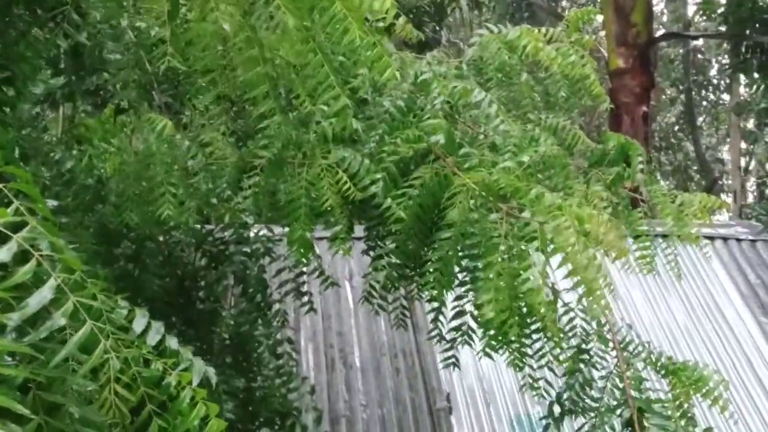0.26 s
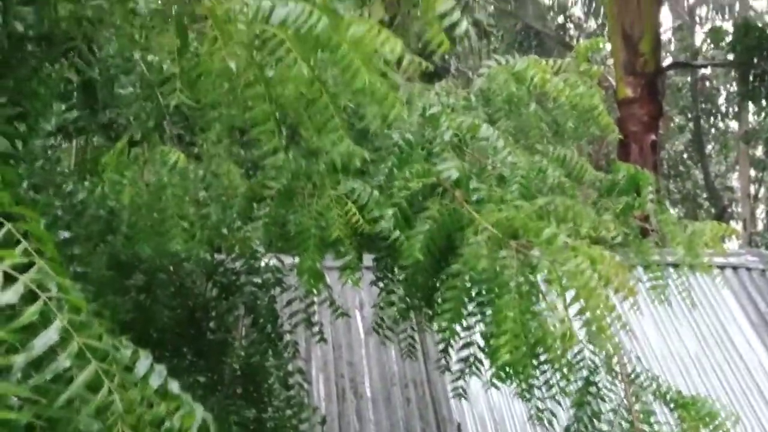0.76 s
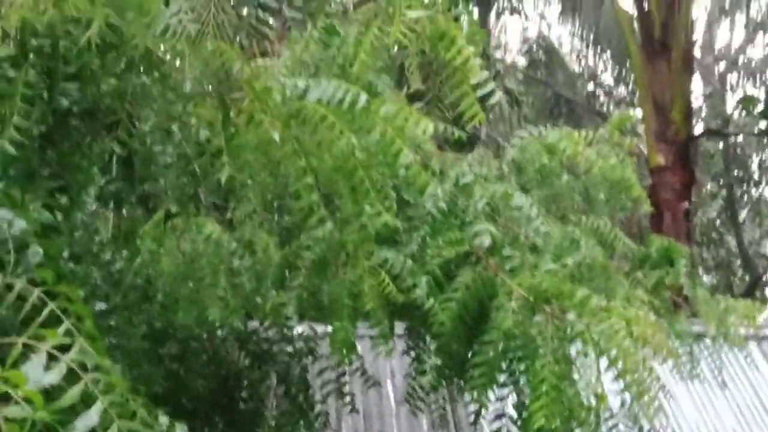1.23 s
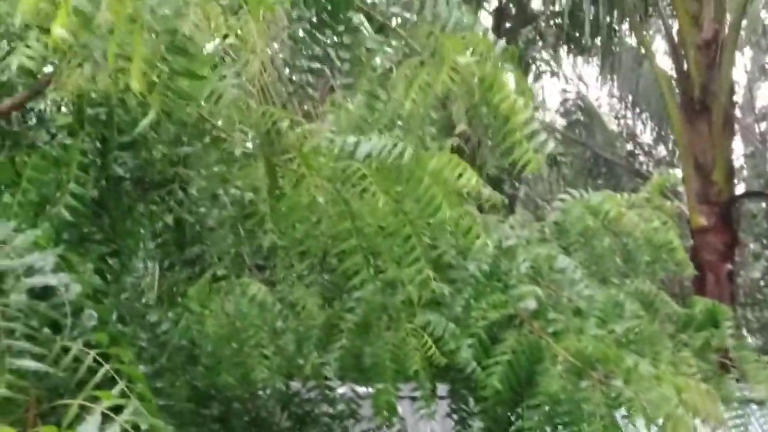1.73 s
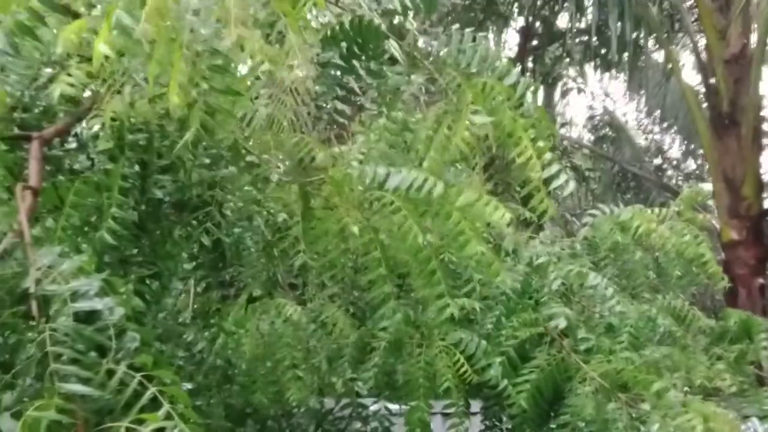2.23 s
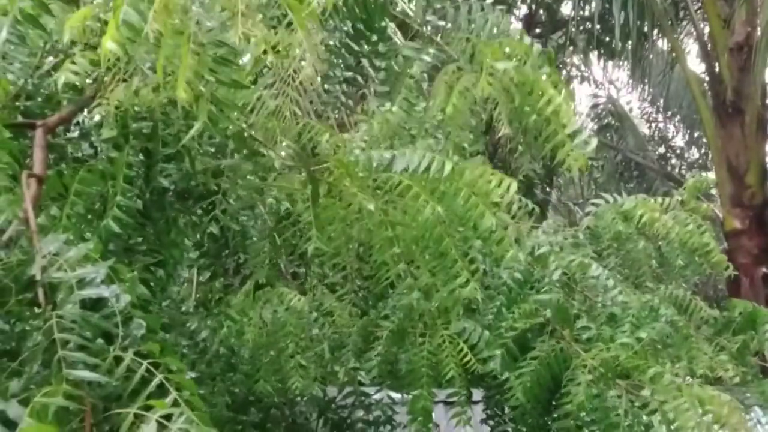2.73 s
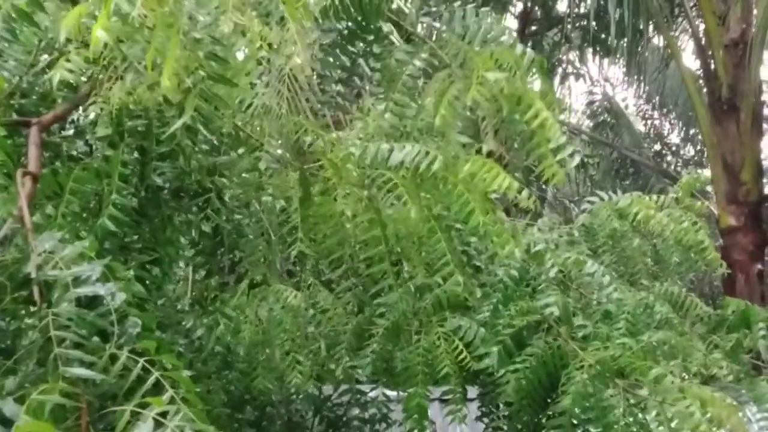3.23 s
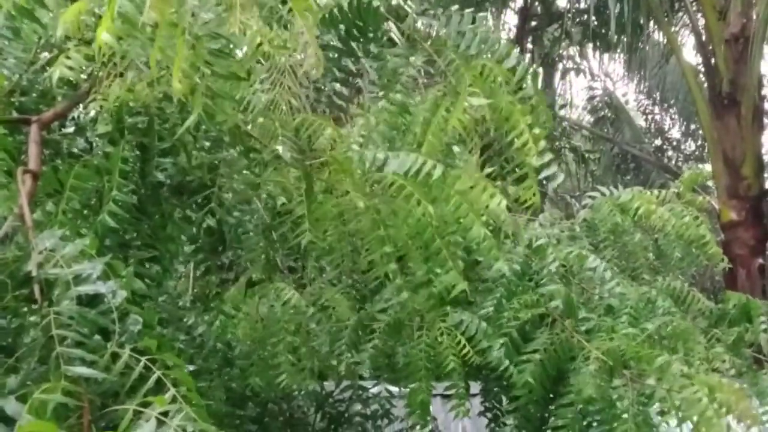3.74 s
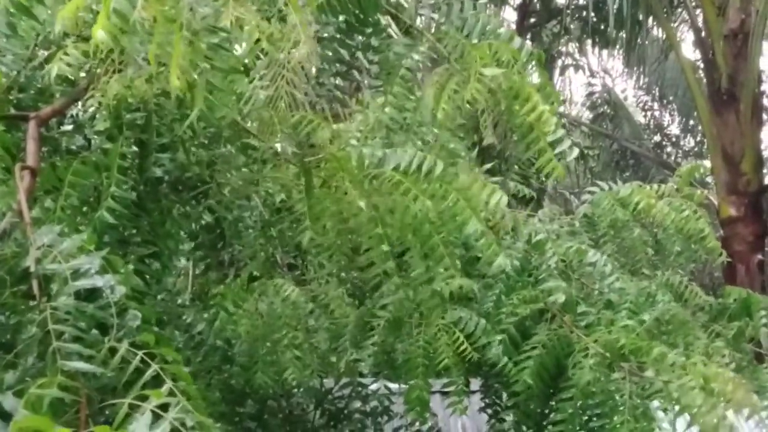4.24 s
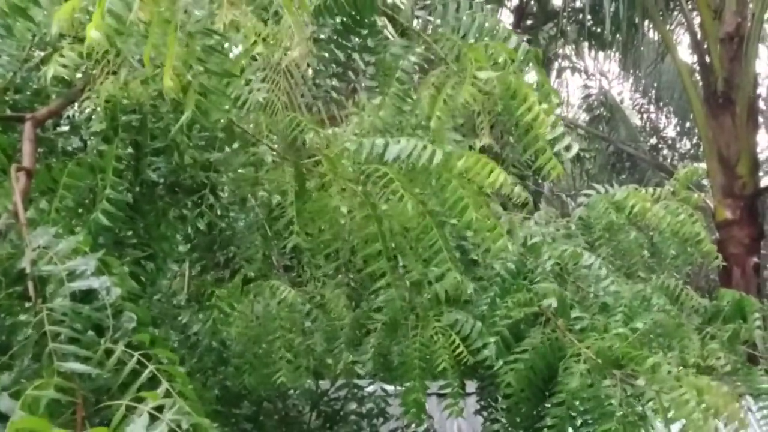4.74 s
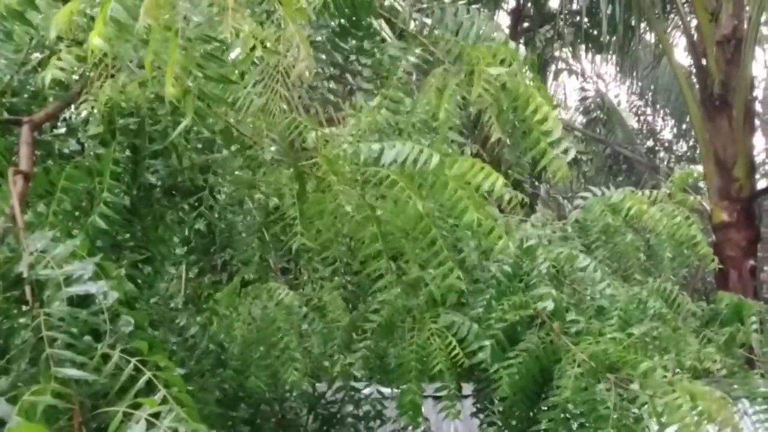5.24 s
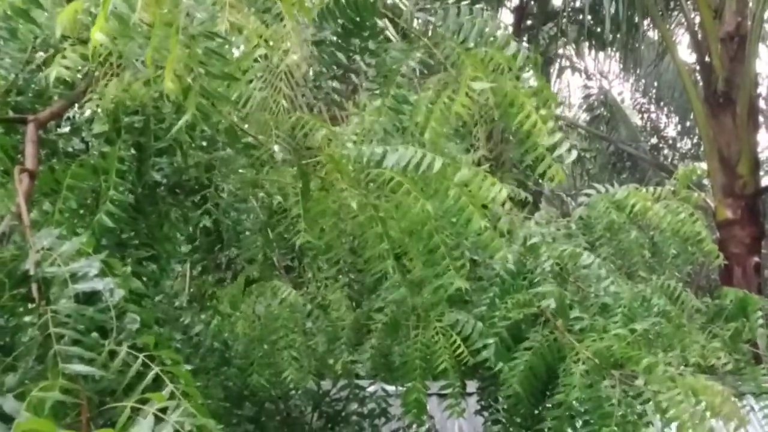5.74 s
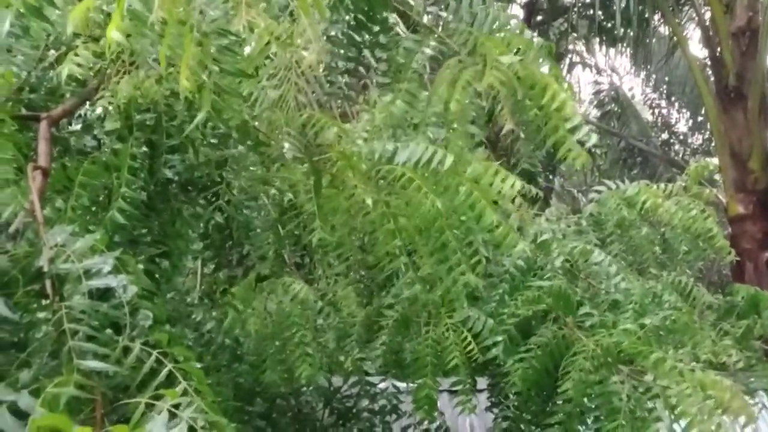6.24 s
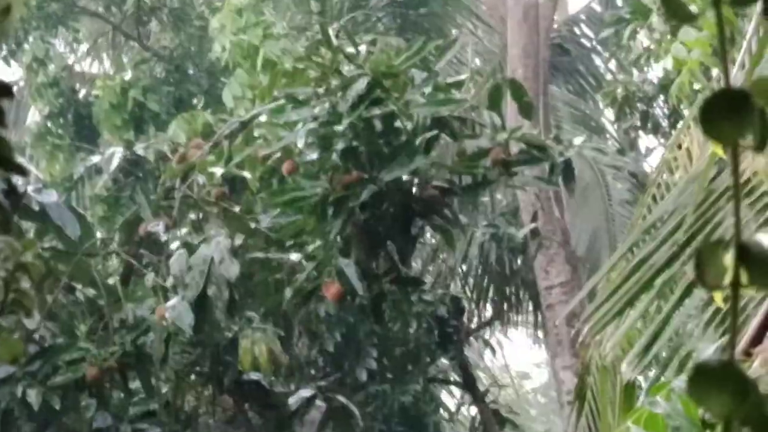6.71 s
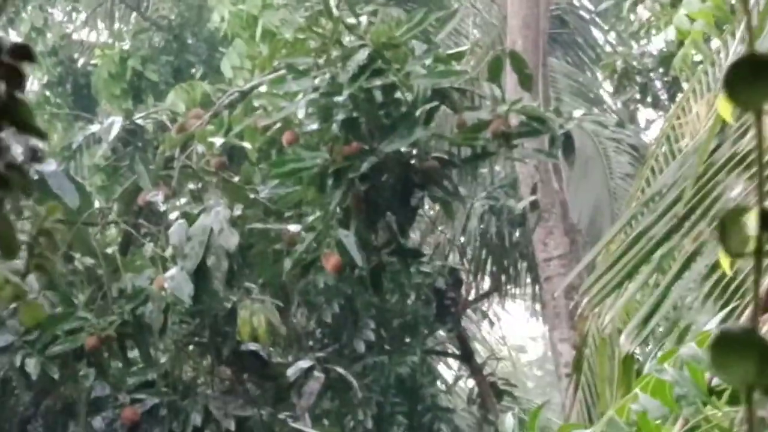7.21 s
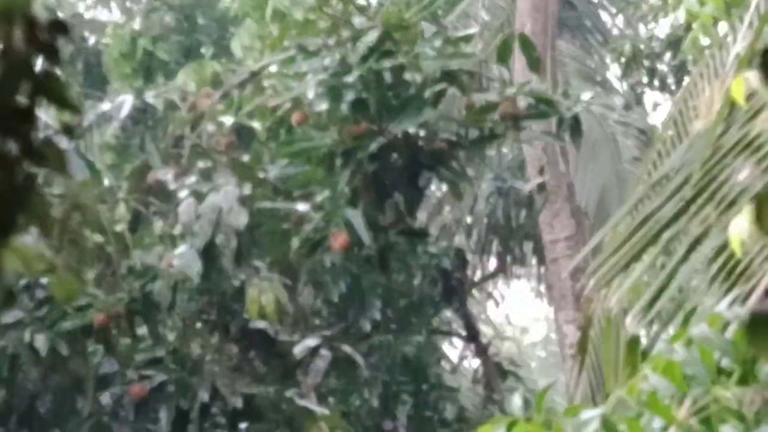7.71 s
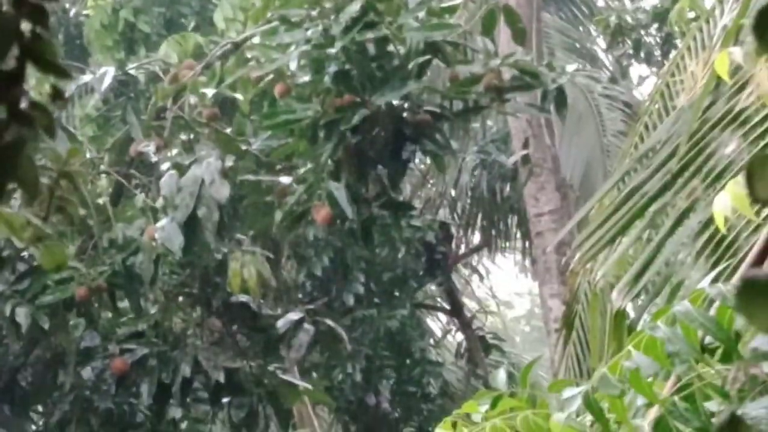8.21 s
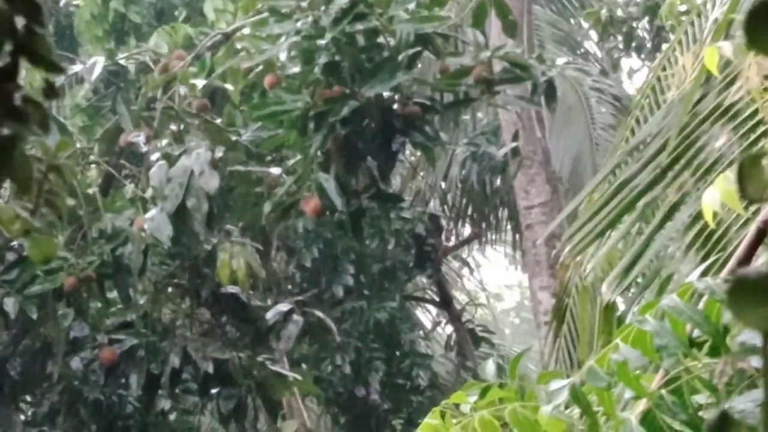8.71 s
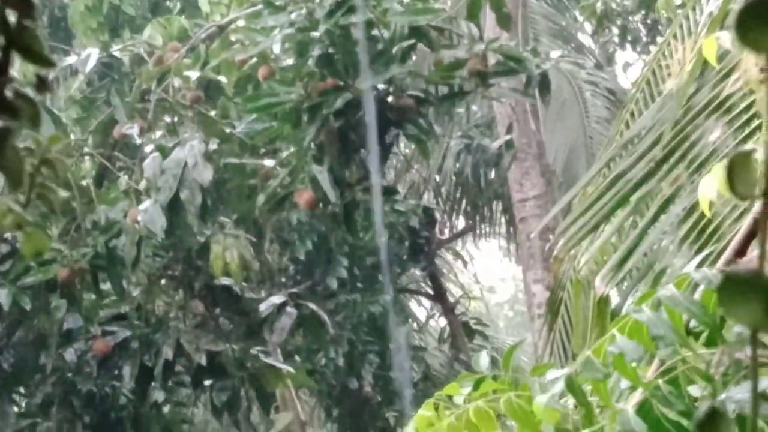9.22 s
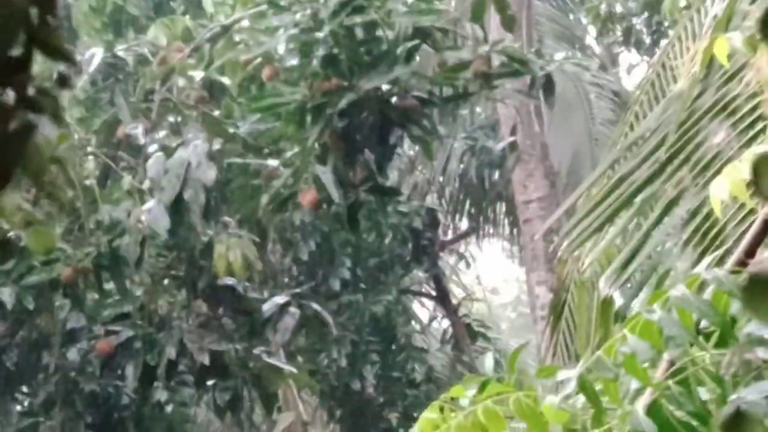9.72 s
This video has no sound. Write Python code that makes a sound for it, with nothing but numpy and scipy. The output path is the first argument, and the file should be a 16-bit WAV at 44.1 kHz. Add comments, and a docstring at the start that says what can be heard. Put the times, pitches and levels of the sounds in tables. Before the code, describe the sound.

Heavy rain pours on a metal roof and leaves while thunder rolls and claps, then the rain turns louder as the rumble fades.

```python
"""Under the eaves, a phone hears heavy rain on a tin roof and on leaves while thunder rolls.
Countless drops blur into a hiss, and a few near ones splat or tick. The thunder is a stream of
low thuds from all along the lightning's path, with louder claps standing out. The sound drops
out for a tenth of a second, then carries on at a second spot with louder rain."""
import sys
import numpy as np
from scipy import signal
from scipy.fft import rfft, irfft, next_fast_len
from scipy.io import wavfile
from scipy.ndimage import uniform_filter1d

SR = 44100
rng = np.random.default_rng(int(sys.argv[2]) if len(sys.argv) > 2 else 0)


def unload_wav(signal):
    """Save mono or channel-first audio to the path in sys.argv[1] as 16-bit WAV at rate SR, clipped to [-1, 1]."""
    wavfile.write(
        sys.argv[1],
        SR,
        np.round(np.clip(np.atleast_2d(signal).T, -1, 1) * 32767).astype(np.int16),
    )


N = 439236
T = np.arange(N) / SR
DROPOUT_START_S, DROPOUT_END_S, SECOND_SPOT_S = 6.3615, 6.4683, 6.502

# Tone of rain on leaves, for the second spot and all splats: f/Hz, level/dB
LEAF_TONE = [(50, -11), (150, -0.5), (350, -3.5), (750, -2.5), (1150, -3.5), (1900, -3.5), (3000, -6),
             (4100, -9), (5000, -20.5), (6500, -24), (7800, -43), (9600, -49.5), (11600, -49.5),
             (15700, -69)]


def undb(db):
    """Turn decibels into a number to multiply a sound by."""
    return 10 ** (np.asarray(db) / 20)


def curves(table):
    """Join a table's timed points with straight lines, giving one curve per value column."""
    times, *columns = np.transpose(table)
    return [np.interp(T, times, column) for column in columns]


def colour(x, tone, ref_hz, tilt_db_per_octave=0):
    """Give x a tone; white noise of strength 1 comes out with strength 1 in the range ref_hz."""
    hz, db = np.transpose(tone)
    size = 8192
    f = np.maximum(np.arange(size // 2 + 1) * SR / size, 1)
    gain = undb(np.interp(np.log(f), np.log(hz), db) + tilt_db_per_octave * np.log2(f))
    in_range = (f >= ref_hz[0]) & (f < ref_hz[1])
    gain /= np.sqrt(2 / size * np.sum(gain[in_range] ** 2))
    # make the filter ring only after a hit, never before it
    cepstrum = irfft(np.log(gain))
    cepstrum[1:size // 2] *= 2
    cepstrum[size // 2 + 1:] = 0
    ring = irfft(np.exp(rfft(cepstrum)))
    return signal.fftconvolve(x, ring)[:N]


def band(x, low_hz, high_hz):
    """Keep only the frequencies between two limits."""
    size = next_fast_len(N)
    f = np.arange(size // 2 + 1) * SR / size
    return irfft(rfft(x, size) * ((f >= low_hz) & (f < high_hz)), size)[:N]


def smooth(x, width):
    """Blur a curve by averaging it twice over width samples."""
    return uniform_filter1d(uniform_filter1d(x, width), width)


def wander(per_s):
    """A smooth random curve that heads for a new value per_s times a second."""
    hold = int(SR / per_s)
    steps = np.repeat(rng.standard_normal(N // hold + 1), hold)
    return 1.3 * smooth(steps, hold)[:N]


def patter(per_s, spread_db, fade_s):
    """Noise that jumps at random hits of uneven size; each fades by 60 dB in fade_s."""
    is_hit = rng.random(N) < per_s / SR
    hit_db = -spread_db * np.log(1 - rng.random(N))
    power_kept = undb(-60 / (fade_s * SR)) ** 2
    power = signal.lfilter([1], [1, -power_kept], is_hit * undb(hit_db) ** 2)
    noise = np.sqrt(power) * rng.standard_normal(N)
    return noise / np.std(noise)


def rain():
    """Far drops blur to a hiss and nearer ones patter; gusts stir it all, the finest spray most."""
    # How loud the rain is: t/s, level/dB
    loudness = [(0, -33.5), (.6, -34.5), (1.1, -34), (2.0, -35), (2.53, -34.5), (2.8, -37), (3.3, -37.5),
                (3.85, -39), (4.3, -40.5), (4.67, -41.5), (4.73, -39), (5.05, -34), (5.2, -35.8),
                (5.42, -36), (5.95, -38.5), (6.36, -36), (6.5, -36), (6.503, -27.5), (7.0, -29.5),
                (7.4, -31.5), (8.7, -32), (8.85, -30.5), (9.08, -30), (9.17, -32.5), (9.55, -30),
                (9.96, -29.5)]
    # Tone of rain on the tin roof, for the first spot: f/Hz, level/dB
    roof_tone = [(50, -15), (150, -8.5), (350, -3.5), (750, -2.5), (1400, -5.5), (1950, -4), (3000, -7.5),
                 (4100, -11.5), (5100, -21), (6600, -25.5), (7800, -42), (11500, -48.5), (13000, -55.5),
                 (15700, -65)]
    drops = rng.standard_normal(N) + undb(-7) * patter(per_s=1200, spread_db=2.14, fade_s=0.031)
    gust_db, dip_db = 0.37 * wander(per_s=9), rain_dips()
    edges_hz = [0, 700, 1400, 2800, 4700, 7500, 11000, SR]
    hiss = np.zeros(N)
    for low, high in zip(edges_hz, edges_hz[1:]):
        flutter_db = (0.55 if low >= 7500 else 0.25) * wander(per_s=15)
        spray_db = -0.14 * dip_db * (low >= 4700)  # fine spray escapes part of each dip
        hiss += undb(gust_db + flutter_db + spray_db) * band(drops, low, high)
    hiss *= undb(curves(loudness)[0] + dip_db) / np.std(hiss)
    roof, leaves = (colour(hiss, tone, ref_hz=(1500, 4000)) for tone in (roof_tone, LEAF_TONE))
    return np.where(T < SECOND_SPOT_S, roof, leaves)


def thunder():
    """Thuds arrive from all along the lightning: near parts crackle higher, far ones are deeper."""
    # Tone of the thuds: f/Hz, level/dB
    tone = [(15, -73), (25, -43.5), (54, -18.5), (98, -3.5), (144, 0), (213, -5), (330, -15), (366, -18),
            (517, -23.5), (900, -38), (1170, -51), (1980, -120)]
    # How the roll swells and fades: t/s, level/dB, crackle boost/dB, bass boost/dB
    roll = [(0, -28, -2.5, 3), (.9, -29.5, -2.5, -1), (1.2, -29, 0, 2), (1.95, -33, -2, 7),
            (2.2, -24.5, -6, -5), (2.535, -31, 5, 7), (2.56, -17, -2.5, -2), (3.0, -18.5, 2, -5.5),
            (3.45, -17.5, 0, 1), (3.63, -27.5, 9, 1), (3.78, -22.5, 5.5, -4), (3.87, -15.5, 5, -5),
            (4.12, -16.5, 1, 0), (4.45, -23.5, 6, -3.5), (4.8, -20.5, 0, -1.5), (5.12, -16, -5, 3),
            (5.6, -14, 1, -6), (5.95, -17.5, 2, -5), (6.08, -25.5, 4, 8), (6.48, -25, 5.5, 1.5),
            (6.65, -28.5, -3.5, 4), (7.1, -32.5, 5.5, 3), (7.5, -26, -5, 3), (8.2, -32.5, 4.5, 0.5),
            (8.6, -32.5, 0.5, 8), (9.45, -34, -3, 0), (9.96, -46, -8, 12)]
    roll_db, crackle_db, bass_db = curves(roll)
    level_db = 10 * np.log10(undb(roll_db) ** 2 + clap_power())
    thuds = colour(patter(per_s=300, spread_db=1.0, fade_s=0.24), tone, ref_hz=(60, 250))
    # even out the thuds' own swells, so the roll's loudness follows the level curve alone
    local_power = smooth(thuds ** 2, int(0.12 * SR))
    thuds /= np.maximum(local_power, 0.05) ** 0.63
    bass = signal.sosfiltfilt(signal.butter(2, 100, "low", fs=SR, output="sos"), thuds)
    crackle = signal.sosfiltfilt(signal.butter(2, 260, "high", fs=SR, output="sos"), thuds)
    return undb(level_db) * (thuds + (undb(crackle_db) - 1) * crackle + (undb(bass_db) - 1) * bass)


def ticks(fade_s=0.08):
    """Tiny droplets burst as short puffs of very high hiss."""
    # Droplets landing: t/s, level/dB
    droplets = [(.137, -68), (.393, -68), (1.398, -63), (1.881, -68), (2.295, -66), (2.398, -65),
                (3.772, -72), (3.852, -71), (4.134, -72), (5.826, -71)]
    puffs = sum(undb(db - 60 * np.maximum(T - start, 0) / fade_s) * (T >= start)
                for start, db in droplets)
    hiss = band(rng.standard_normal(N), low_hz=8000, high_hz=13000)
    return puffs * hiss / np.std(hiss)


def splats(rise_s=0.0016, fade_s=0.11):
    """Each near drop is a quick burst of spray, brighter than the rain behind it."""
    # Near drops landing: t/s, level/dB
    near_drops = [(0.963, -52), (1.1145, -45.5), (2.455, -58), (4.188, -53), (4.682, -52.5), (6.064, -51.5),
                  (7.0514, -57), (7.4062, -41), (7.8436, -52), (7.8934, -46), (7.918, -45.5),
                  (8.0586, -43.5), (8.9825, -42.5), (9.191, -47), (9.3122, -47), (9.6744, -44)]
    bursts = np.zeros(N)
    for start, db in near_drops:
        span = slice(int(start * SR), int(start * SR) + SR // 4)
        age = T[span] - start
        bursts[span] += undb(db - 60 * age / fade_s) * np.clip(age / rise_s, 0, 1)
    spray = bursts * rng.standard_normal(N)
    return colour(spray, LEAF_TONE, ref_hz=(5000, 12000), tilt_db_per_octave=3)


def rain_dips(fall_s=0.011, return_s=0.05, deepen=1.3):
    """The rain's level change in dB near three loud claps: it drops fast, sinks on, then comes back."""
    # Brief dips: start t/s, first drop/dB, time held/s
    dips = [(2.545, -8, 0.15), (3.9, -3, 0.12), (5.441, -3.5, .08)]
    return sum(db * np.interp(T - start, [0, fall_s, held, held + return_s], [0, 1, deepen, 0])
               for start, db, held in dips)


def clap_power(rise_s=0.016, fade_s=0.26):
    """The power that claps add to the thunder: each swells quickly, then rumbles away."""
    # Claps that stand out of the roll: peak t/s, level/dB
    claps = [(2.564, -8.5), (2.603, -14), (2.77, -25), (2.885, -15), (3.345, -12), (3.39, -14), (3.44, -15),
             (3.809, -11.5), (3.895, -13), (3.945, -15.5), (4.015, -20.5), (4.181, -13), (4.31, -23),
             (4.74, -19), (4.86, -23), (5.36, -10.5), (5.48, -18), (5.789, -21), (5.885, -15.5),
             (6.125, -23), (6.19, -24.5), (6.29, -24.5), (6.34, -22)]
    power = np.zeros(N)
    for peak, db in claps:
        swell = np.clip(1 + (T - peak) / rise_s, 0, 1)
        fade = undb(db - 60 * np.maximum(T - peak, 0) / fade_s)
        power += (swell * fade) ** 2
    return power


def scene():
    """Rain, thunder and near drops, added into one channel."""
    return (rain() + thunder() + ticks() + splats())[None]


def record(dry, bass_cut_hz=42, treble_cut_hz=15750):
    """The phone thins the deepest bass, rounds the peaks, goes silent briefly and cuts the top treble."""
    thinned = signal.sosfilt(signal.butter(2, bass_cut_hz, "high", fs=SR, output="sos"), dry)
    rounded = np.tanh(0.86 * thinned) / 0.77
    sound_on = (T < DROPOUT_START_S) | (T > DROPOUT_END_S)
    treble_cut = signal.ellip(10, 0.2, 70, treble_cut_hz, fs=SR, output="sos")
    return signal.sosfilt(treble_cut, sound_on * rounded)


dry = scene()
out = record(dry)
unload_wav(out)
```